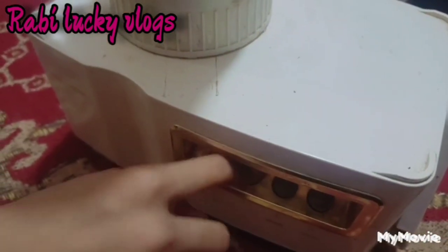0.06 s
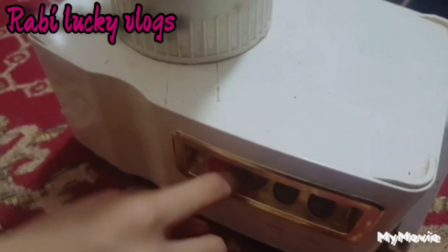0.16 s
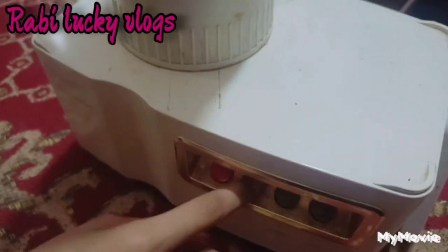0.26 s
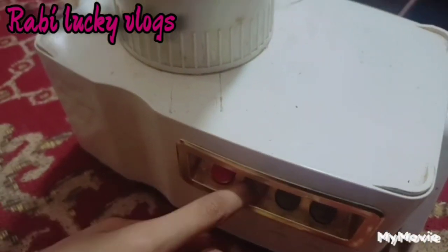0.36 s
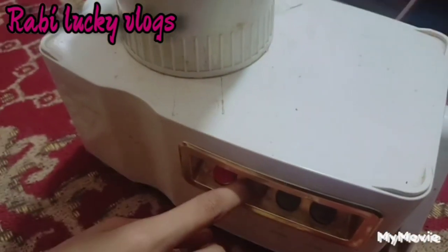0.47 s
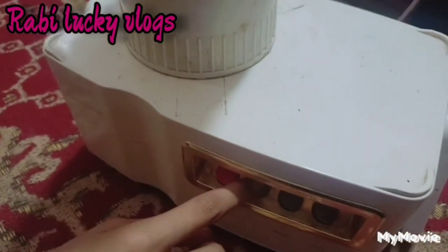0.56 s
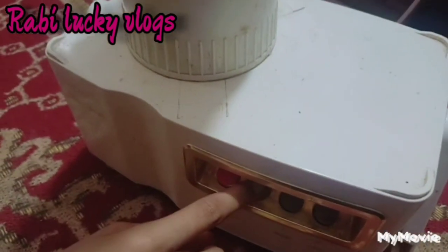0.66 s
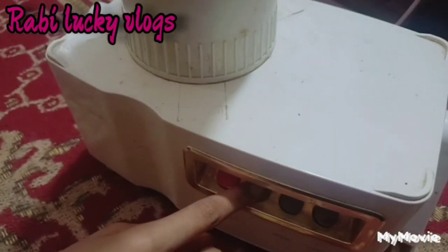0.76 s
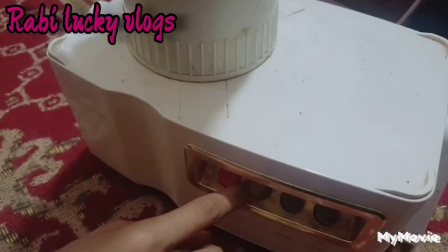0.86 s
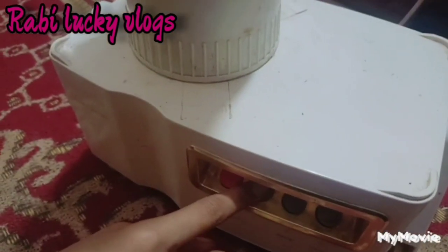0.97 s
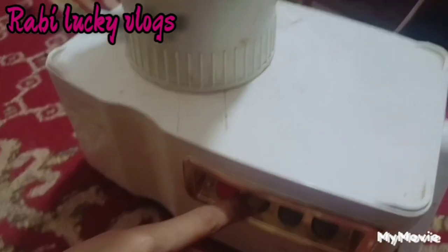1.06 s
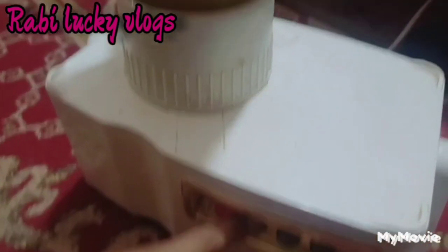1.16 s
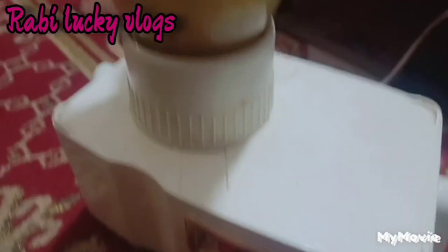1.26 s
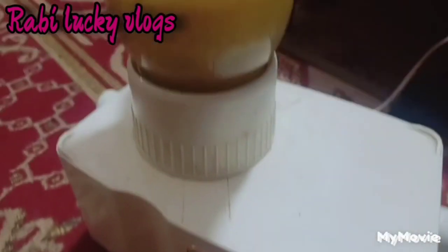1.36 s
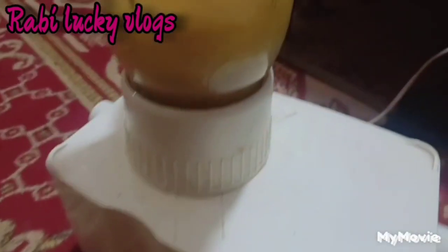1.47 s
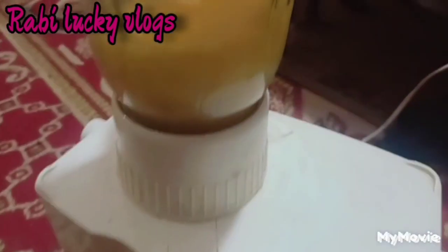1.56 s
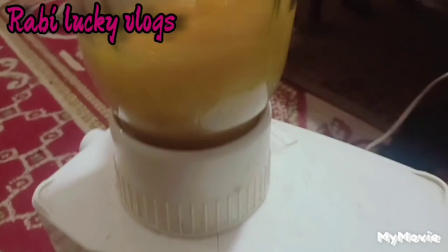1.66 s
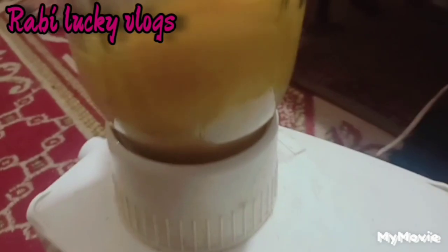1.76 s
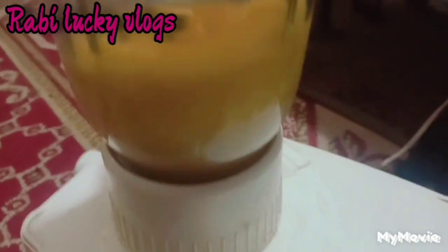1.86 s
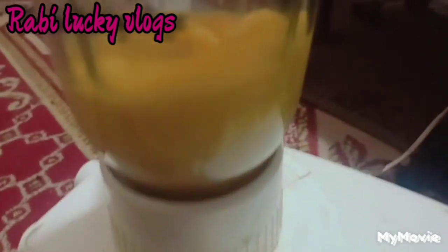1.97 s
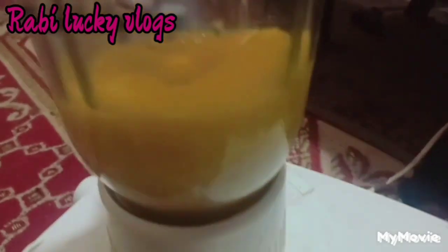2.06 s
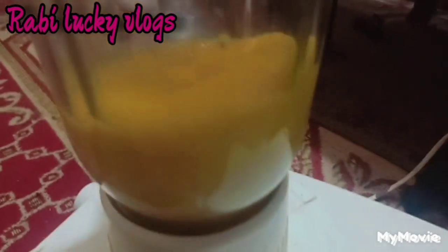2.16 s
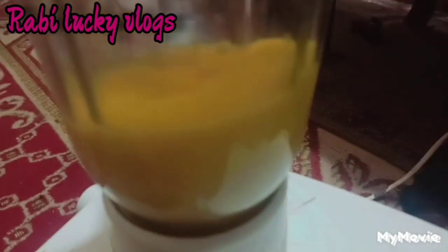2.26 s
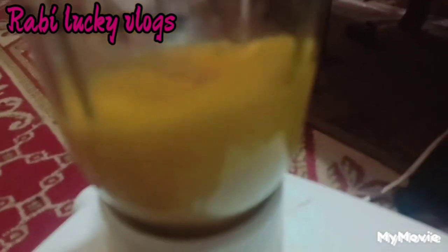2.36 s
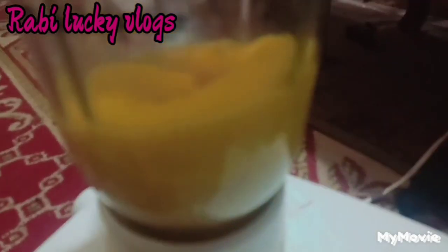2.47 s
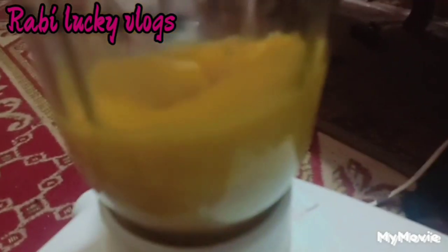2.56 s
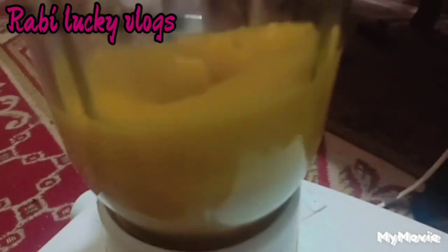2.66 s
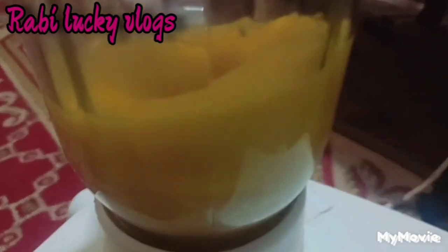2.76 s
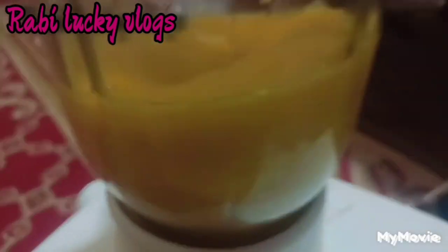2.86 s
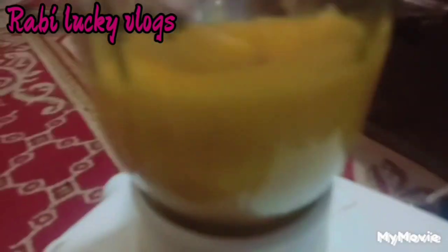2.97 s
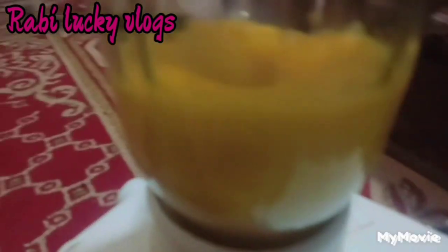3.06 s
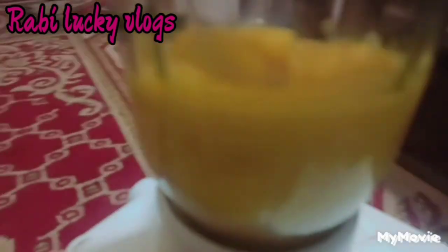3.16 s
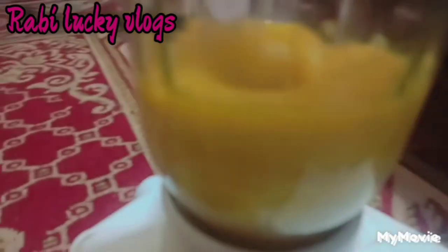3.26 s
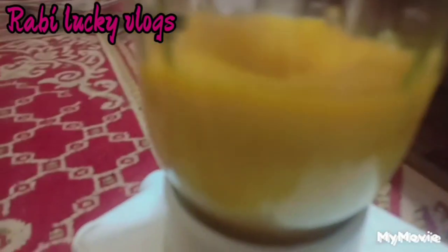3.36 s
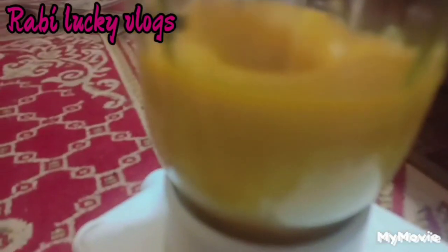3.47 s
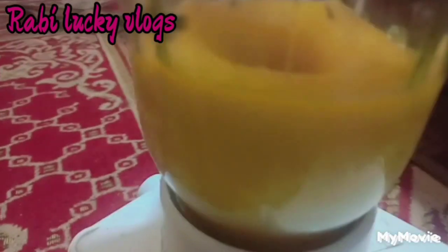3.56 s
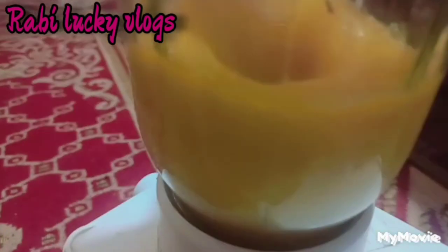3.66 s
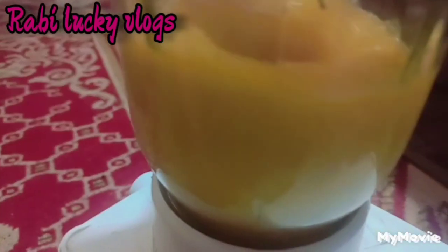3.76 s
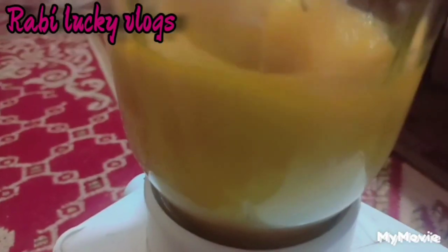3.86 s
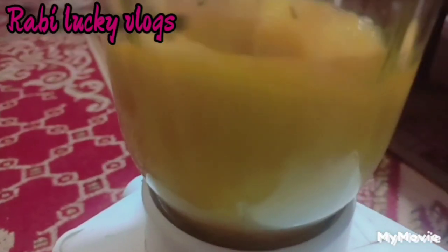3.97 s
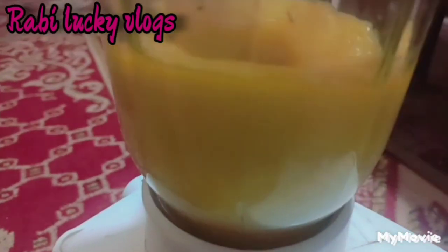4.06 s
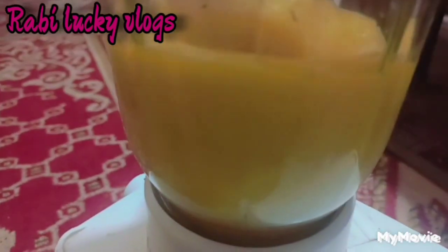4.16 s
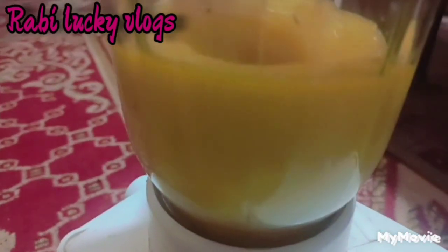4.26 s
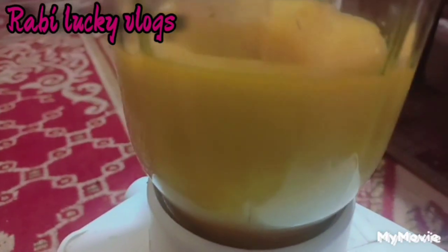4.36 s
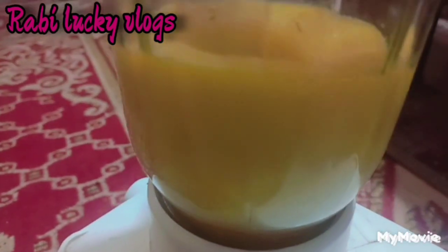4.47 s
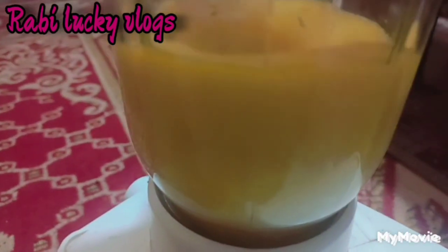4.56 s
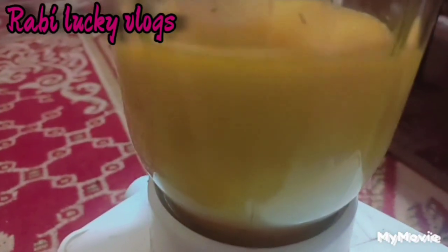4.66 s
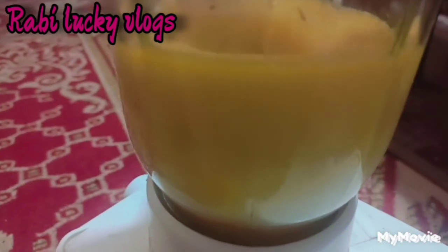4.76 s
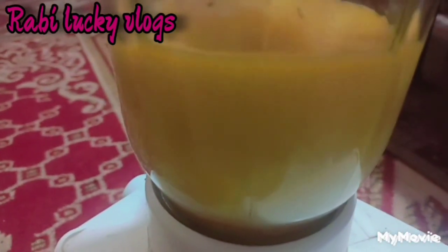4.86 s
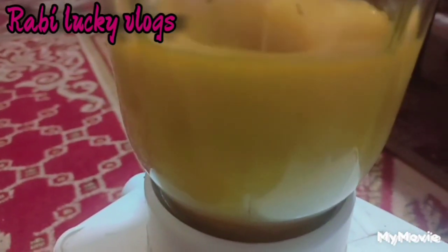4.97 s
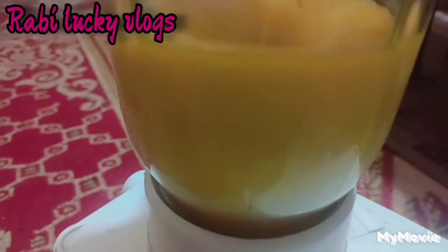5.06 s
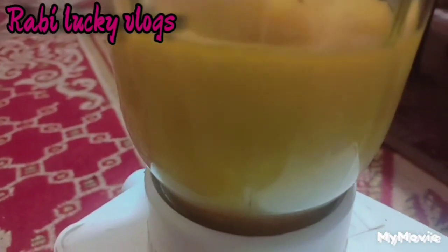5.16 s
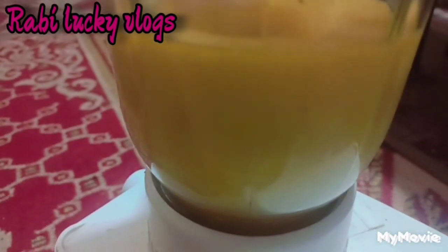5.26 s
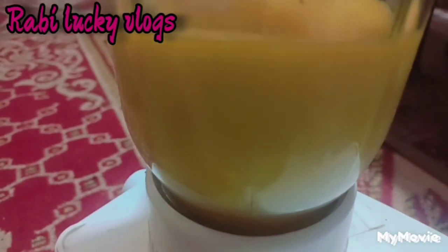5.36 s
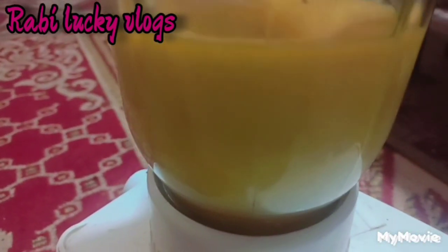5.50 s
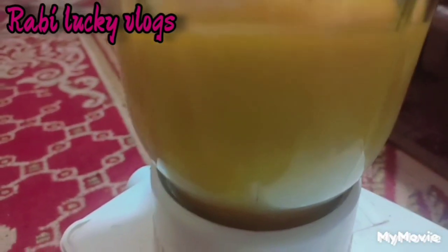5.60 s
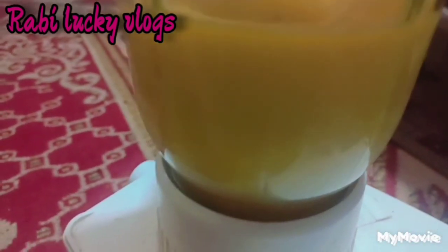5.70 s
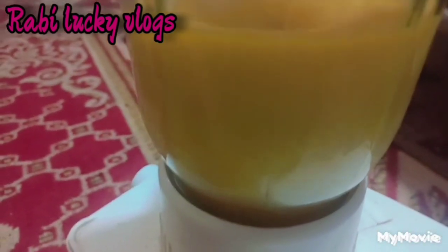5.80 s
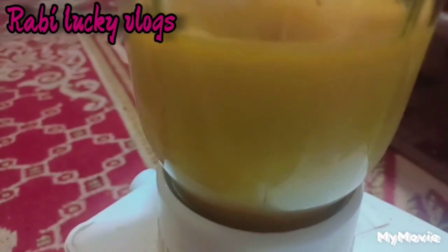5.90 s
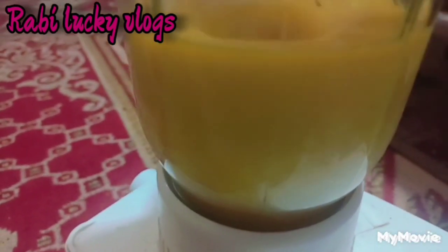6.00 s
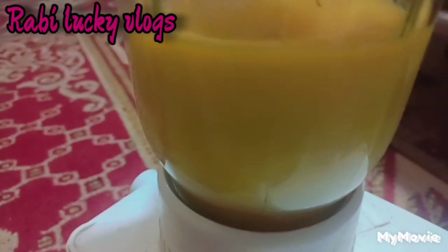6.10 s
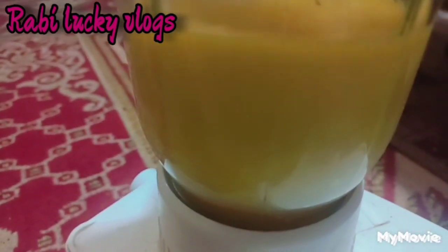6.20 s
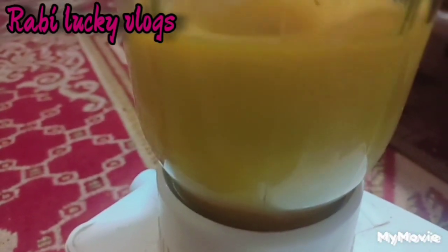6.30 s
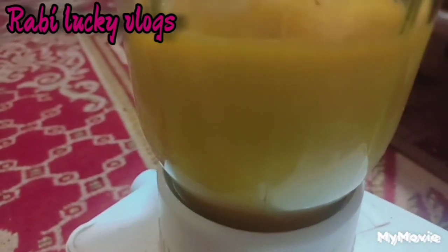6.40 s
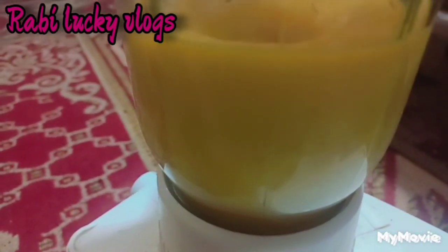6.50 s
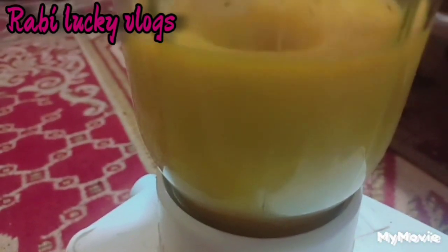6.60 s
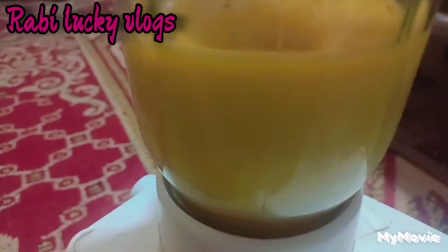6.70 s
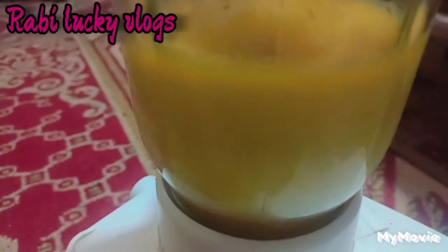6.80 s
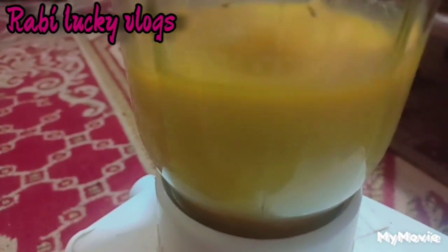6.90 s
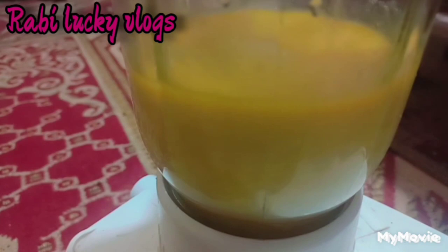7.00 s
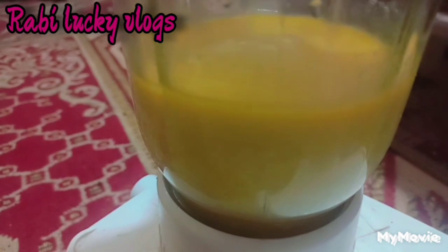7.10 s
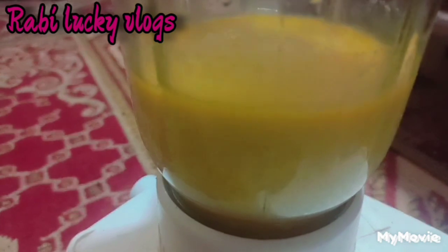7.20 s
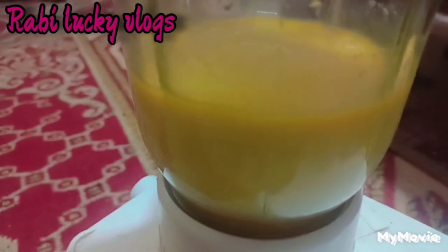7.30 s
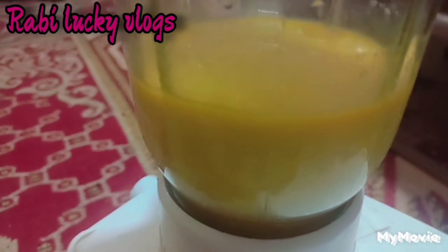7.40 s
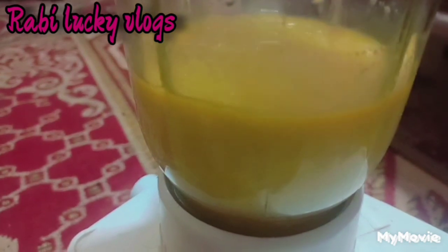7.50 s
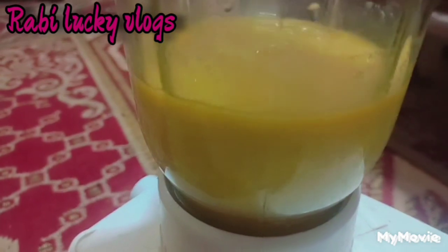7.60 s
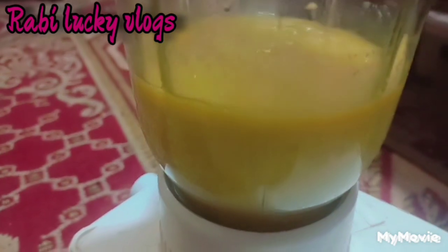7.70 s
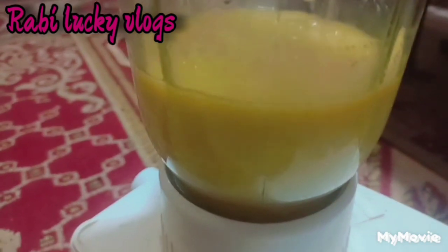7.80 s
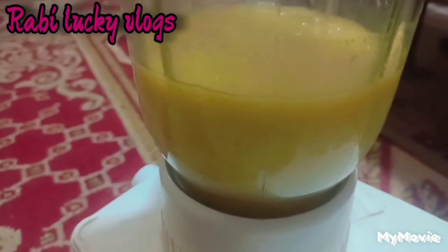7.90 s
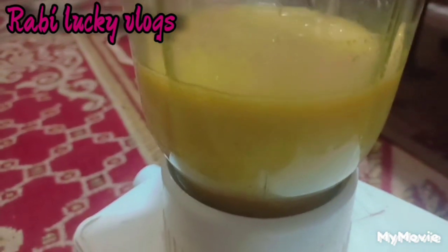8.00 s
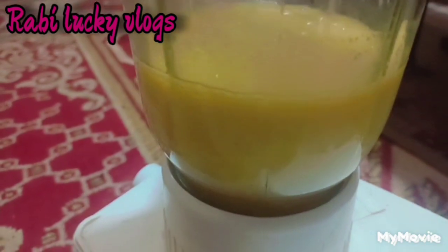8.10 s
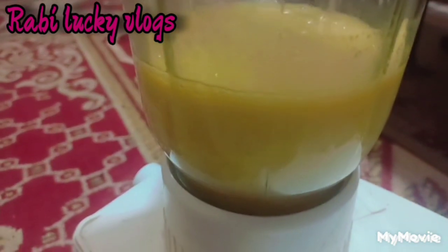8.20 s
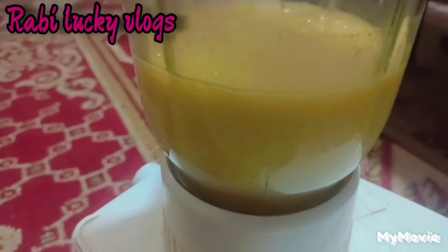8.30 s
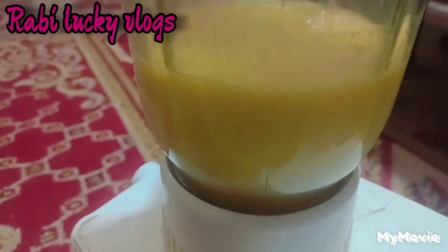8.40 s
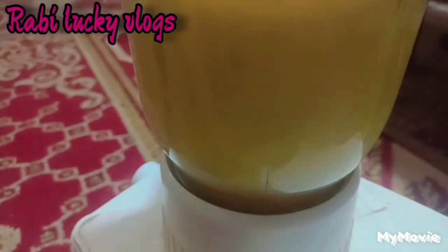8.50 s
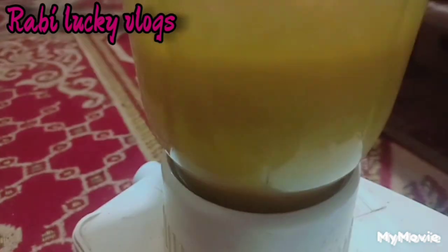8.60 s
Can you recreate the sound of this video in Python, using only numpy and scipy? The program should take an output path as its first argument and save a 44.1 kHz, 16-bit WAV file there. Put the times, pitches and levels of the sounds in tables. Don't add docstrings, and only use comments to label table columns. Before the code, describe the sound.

Close, gritty blender motor whirring through thick liquid, abruptly switched off into room hush with faint glassy ticks, then suddenly restarting at the end.

```python
import sys
import numpy as np
from scipy import signal
from scipy.io import wavfile
from scipy.ndimage import uniform_filter1d, minimum_filter1d

SR = 44100
rng = np.random.default_rng(int(sys.argv[2]) if len(sys.argv) > 2 else 0)


def put_to_file(sound):
    columns = np.atleast_2d(sound).T
    safe = np.clip(columns, -1, 1)
    whole_steps = np.round(safe * 32767)
    wavfile.write(sys.argv[1], SR, whole_steps.astype(np.int16))


def decibels_to_gain(level_db):
    exponent = np.asarray(level_db, float) / 20
    return 10 ** exponent


N = 381465

# [time_s, place (0 by the casing, 1 by the collar, 2 by the jar)]
PLACE = [(0, 0.033), (.55, 0.069), (.68, 0.68), (1.2, 0.72), (1.4, 0.9), (2.0, 1.27), (2.7, 1.1),
         (3.1, 1.56), (4.2, 1.73), (4.6, 1.76), (5.8, 1.7), (6.9, 1.66), (8.38, 0.86), (8.65, 1.7)]
COAST_S = 0.15


def blender():
    # [time_s, peak_db]
    hard_knocks = [(0.0024, -2), (0.0224, -5), (0.0393, -9), (0.0677, 10), (0.1078, -11), (0.1299, 1),
                   (0.2823, -7), (1.4272, -9), (2.3222, -2), (2.386, 1), (6.6777, -5), (6.717, -3),
                   (6.7896, 8), (8.3886, -2), (8.4022, 0), (8.4267, -8), (8.4673, 0), (8.5293, -6),
                   (8.573, -6)]
    groan_db, groan_s, coast_groan_db = 7.5, 0.26, -4
    snap_times_s, snap_db, snap_s = [6.792, 8.405], 12.5, 0.0044
    coast_dull_db = -2.5
    since, coast, (_, take_up_s, _, treble_short_db, _) = state()
    t = np.arange(N) / SR
    drive = chatter() * effort() + decibels_to_gain(-4) * burst(hard_knocks, ms=2.0)

    place = np.clip(along(PLACE), 0, 2)
    heard = 0
    for k in range(3):
        share = np.clip(1 - abs(place - k), 0, 1)
        heard = heard + share * signal.oaconvolve(drive, colour(k))[:N]

    drone, rest = split(heard, 700)
    body, treble = split(rest, 3700)
    drone_db = -0.7 + groan_db * np.exp(-(since / groan_s) ** 4)
    drone_db = drone_db + coast_groan_db * coast.clip(0, COAST_S) / COAST_S
    bright_db = -1.24 + coast_dull_db * np.clip(coast / 0.01, 0, 1)
    bright_db = bright_db + treble_short_db * np.exp(-since / take_up_s)
    bright_db = bright_db + sum(snap_db * np.exp(-((t - s) / snap_s) ** 2) for s in snap_times_s)
    return drone * decibels_to_gain(drone_db) + body + treble * decibels_to_gain(bright_db)


def chatter():
    blows_per_s, spread_db, scrape_ms = 2500, 0.5, 1.9
    clump_db, hiss = 0.9, 0.9
    chips_per_s, chips_db = 14, 13
    grit_per_s, grit_db = 110, 5
    own_db, drift_db = 1.5, 0.38
    rate, depth = speed()
    turns = np.cumsum(rate * (1 + 0.056 * wander(17.0))) / SR
    beat = (1 + depth * np.cos(2 * np.pi * turns)) * decibels_to_gain(clump_db * wander(39))
    size = decibels_to_gain(spread_db * np.minimum(rng.exponential(1, N), 3))
    size = size * (rng.random(N) < blows_per_s / SR)
    scrape = signal.lfilter([1], [1, -np.exp(-1000 / SR / scrape_ms)], size)
    scrape = evened(scrape * rng.standard_normal(N))
    blows = evened(beat * scrape + hiss * rng.standard_normal(N))

    grit = signal.lfilter([1], [1, -.985], rng.random(N) < grit_per_s / SR) * rng.standard_normal(N)
    grit = split(grit, 3560)[1]
    chips = signal.lfilter([1], [1, -.96], rng.random(N) < chips_per_s / SR) * rng.standard_normal(N)
    mix = blows + decibels_to_gain(chips_db) * chips + decibels_to_gain(grit_db) * grit

    z = signal.stft(mix, nperseg=256, noverlap=128)[2]
    bins, frames = z.shape
    own = own_db * patches(frames, bins, 3, 3)
    drift = drift_db * patches(frames, bins, 150, 2)
    return evened(signal.istft(z * decibels_to_gain(own + drift), nperseg=256, noverlap=128)[1][:N])


def speed():
    spin_from, spin_to, spin_up_s, spin_down_s = 42, 66, 0.8, 0.25
    beat_running, beat_starting, beat_s = 0.17, 0.8, 0.085
    since, coast, _ = state()
    rate = spin_to + (spin_from - spin_to) * np.exp(-since / spin_up_s)
    rate = rate * np.exp(-coast / spin_down_s)
    depth = beat_running + beat_starting * np.exp(-np.arange(N) / SR / beat_s)
    return rate, np.clip(depth, 0, 1)


def effort():
    # [time_s, chatter_db]
    bite = [(0, -11), (.25, -11), (.8, -13.5), (1.17, -9), (1.35, -11), (1.6, -13), (1.9, -11), (2.5, -12),
            (3.15, -11), (3.5, -11), (4.2, -10.5), (4.6, -12.5), (5.1, -10.5), (5.65, -10.5), (5.8, -11.5),
            (6.78, -11), (8.4, -11.5), (8.65, -10.5)]
    # [time_s, depth_db, recovery_s]
    air_gulps = [(.008, -5, 0.011), (.046, -3, 0.017), (1.2, -5.5, 0.083), (1.47, -3, 0.039),
                 (1.98, -3, 0.061), (2.35, -4.5, 0.022), (2.4, -3, 0.046), (3.2, -4, 0.092),
                 (4.27, -3, 0.073), (4.72, -2.5, 0.03), (4.92, -2.5, 0.081), (5.15, -3.5, 0.061),
                 (6.27, -2, 0.02), (6.33, -1.5, 0.21), (6.655, -4, 0.031), (6.7, -0.5, 0.027),
                 (6.77, -6, .03), (8.406, -3, .015)]
    # [after_cut_s, step_db]
    coast_steps = [
        (0.0, -5.5),
        (0.078, -6),
        (0.127, -5),
    ]
    gulp_in_s, coast_db_per_s = 0.0057, -25
    since, coast, (_, take_up_s, chatter_short_db, _, _) = state()
    t = np.arange(N) / SR
    level_db = along(bite) + chatter_short_db * np.exp(-since / take_up_s) + coast_db_per_s * coast
    for s, db, back_s in air_gulps:
        recovery = np.exp(-np.maximum(t - s - gulp_in_s, 0) / back_s)
        level_db = level_db + db * np.clip((t - s) / gulp_in_s, 0, 1) * recovery
    for s, db in coast_steps:
        level_db = level_db + db * np.clip((coast - s) / 0.004, 0, 1)
    return decibels_to_gain(level_db) * (coast < COAST_S)


def state():
    # [start_s, take_up_s, chatter_short_db, treble_short_db, inrush_hum_db]
    starts = [
        (0.0, 0.12, -3, -13.5, 9),
        (8.386, 0.017, -6, -12, 5),
    ]
    off_s = 6.795
    t, rows = np.arange(N) / SR, np.array(starts)
    index = np.searchsorted(rows[:, 0], t, "right") - 1
    last = rows[np.clip(index, 0, None)].T
    coast = np.maximum(t - off_s, 0) * (t < rows[-1, 0])
    return np.maximum(t - last[0], 0), coast, last


def colour(place):
    # [pitch_hz, casing_db, collar_db, jar_db]
    broad = [(40, -37, -39, -49), (63.5, -31, -26, -44), (104, -35, -47, -34), (211, -15, -18.5, -27.5),
             (604, -18, -22, -21), (1025, -15, -25.5, -17.5), (2270, -6.5, -12, -12.5),
             (3304, 4.5, -3.5, -4.5), (4220, -2.5, -11.5, -2.5), (7020, -19, -20, -24.5),
             (9280, -14.5, -32, -31.5), (10050, -24.5, -38, -36.5), (12000, -33, -33, -42),
             (15500, -43, -33.5, -43)]
    # [pitch_hz, width_hz, casing_db, collar_db, jar_db]
    body_rings = [(154, 8.1, 1, -19.5, -14), (218, 19, -2, -15, 17), (232.7, 30, 3, 8.5, -23),
                  (371, 148, 7.5, 7.5, 10.5), (458.4, 57, -5, -16, -15), (614, 88, 11.5, 1.5, -4),
                  (827, 177, 8.5, 16.5, 10), (1285, 80, -0.5, 5.5, 0.5), (1461, 124, 1, 8, 7),
                  (1744, 94, -4, -6.5, -8.5), (1877, 150, 9.5, 10, 9.5), (2658, 200, 2.5, 1.5, 8),
                  (2890, 108, 7.5, 4, 9.5), (3210, 280, 5.5, 0, -1),
                  (3508, 234, -2, 7.5, 3.5), (3800, 180, -4, 3.5, 3.5), (4404, 290, 1, -1.5, -20),
                 (4796, 130, -7, -17.5, 0), (5097, 420, -2.5, -13, -10), (5970, 450, 2, 5.5, 1),
                 (6470, 430, 4.5, -5, -9.5), (7190, 1630, 13, 3, 12.5), (7890, 920, 3.5, 1.5, -6.5),
                 (9020, 330, 8.5, 0, 8.5), (11000, 700, 4, -2, 1.5), (12200, 494, 1, -1, -1),
                 (13300, 800, -2, -5, 6), (14600, 600, 12, -12, 0)]
    hz = np.fft.rfftfreq(8192, 1 / SR)
    rows = np.array(broad)
    db = np.interp(np.log(hz + 1), np.log(rows[:, 0]), rows[:, 1 + place])
    for ring in body_rings:
        db = db + ring[2 + place] / (1 + (2 * (hz - ring[0]) / ring[1]) ** 2)
    return causal(db)


def windings():
    # [pitch_hz, level_db, change_away_from_casing_db]
    harmonics = [(100, -70, 0), (149.8, -49, 2), (200.8, -42, -5.5), (251, -55, 3), (303, -45, -1.5),
                 (352, -56, -6)]
    near_db, far_db, edge_place, inrush_s = 2.5, -2, 0.72, 0.086
    since, coast, (_, _, _, _, inrush_db) = state()
    t = np.arange(N) / SR
    away = np.clip((along(PLACE) - edge_place) / 0.08 + .5, 0, 1)
    lines = 0
    for hz, db, change_db in harmonics:
        strength = decibels_to_gain(db + 1.0 + change_db * away + 2.1 * wander(6.7))
        lines = lines + strength * np.sin(2 * np.pi * (hz * t + rng.random()))
    level_db = near_db + (far_db - near_db) * away + inrush_db * np.exp(-since / inrush_s)
    powered = uniform_filter1d(1. * (coast == 0), size=400)
    return lines * decibels_to_gain(level_db) * powered


def ticks():
    # [time_s, peak_db, treble_db]
    pause_ticks = [(6.9744, -25, -10), (7.01, -6, -25), (7.0443, -18, -17), (7.1856, -32, -18),
                   (7.249, -12.5, -26), (7.3654, -21.5, -17), (7.7199, -31, -20), (7.974, -15.5, -25),
                   (8.1375, -16.5, -17), (8.281, -17.5, -13.5)]
    # [time_s, peak_db, t60_s]
    clinks = [
        (7.2524, -26, 0.032),
        (7.9857, -37, 0.15),
        (8.142, -21.5, 0.04),
        (8.286, -30, 0.19),
    ]
    glass_hz = 7350
    rows, t = np.array(pause_ticks), np.arange(N) / SR
    jar = colour(2)
    body = signal.oaconvolve(burst(rows[:, :2], ms=4.4), jar)[:N]
    body = split(body, 3280)[0]
    body = split(body, 1730)[1]
    edge_events = np.c_[rows[:, 0], rows[:, 1] + rows[:, 2]]
    edge = signal.oaconvolve(burst(edge_events, ms=11.0), jar)[:N]
    edge = split(edge, 6500)[1]
    edge = split(edge, 12500)[0]
    dying = 0
    for s, db, t60 in clinks:
        dying = dying + decibels_to_gain(db - 3.0 - 60 * abs(t - s) / np.clip(t60, .03, .2)) * (t > s)
    glass = dying * np.sin(2 * np.pi * glass_hz * t)
    return room(decibels_to_gain(2.0) * body + decibels_to_gain(19.0) * edge + glass)


def rustle():
    start_s, level_db, band_hz = 7.91, -49.5, (4600, 9600)
    t = np.arange(N) / SR
    band = signal.butter(4, band_hz, "band", fs=SR, output="sos")
    cloth = evened(signal.sosfilt(band, rng.standard_normal(N)))
    cloth = cloth + decibels_to_gain(-17) * rng.standard_normal(N)
    return cloth * decibels_to_gain(level_db + 3.1 * wander(18)) * np.clip((t - start_s) / 0.066, 0, 1)


def hush():
    # [pitch_hz, level_db_per_hz]
    air_colour = [(38, -35), (62, -9.5), (190, 3), (400, -12), (530, -5.5), (880, -7.5), (1950, -16.5),
                  (2900, -12), (4000, -11), (4500, -26.5), (7300, -22), (9500, -27.5), (10300, -40),
                  (13000, -49), (15500, -45)]
    # [pitch_hz, width_hz, level_db]
    air_rings = [(185, 49, -3.5), (322, 160, -1.5), (530, 29, 6), (579, 40, 6.5), (766, 80, -4.5),
                 (870, 42, 5.5), (2580, 80, 4.5), (2920, 110, 7), (3330, 101, 2), (3980, 150, 4),
                 (6900, 280, 4), (7900, 300, 6)]
    # [time_s, level_db]
    air_level = [(6.95, -30.5), (7.132, -32), (8.06, -31), (8.35, -31)]
    # [time_s, pitch_hz, length_s, level_db]
    far_bumps = [
        (7.40, 870, .05, -41),
        (7.40, 570, .05, -41),
        (7.67, 600, .04, -39),
        (7.78, 885, .06, -36),
        (8.21, 850, .12, -40),
    ]
    duck_db = -8.5
    frames, hz = N // 256 + 5, np.fft.rfftfreq(1024, 1 / SR)
    a, b = rng.standard_normal((frames, 513, 2)).T
    rows = np.array(air_colour)
    shape_db = np.interp(np.log(hz + 1), np.log(rows[:, 0]), rows[:, 1])
    for f, wide, db in air_rings:
        shape_db = shape_db + db / (1 + (2 * (hz - f) / wide) ** 2)
    patchy_db = np.interp(hz, [1000, 4000, 5000], [2.4, 1.8, 1])[:, None] * patches(frames, 513, 10, 2)
    spectrum = (a + 1j * b) * decibels_to_gain(shape_db[:, None] + patchy_db)
    air = evened(signal.istft(spectrum, nperseg=1024, noverlap=768)[1][:N])

    t = np.arange(N) / SR
    bumps = 0
    for s, f, length_s, db in far_bumps:
        swell = np.exp(-(2 * (t - s) / length_s) ** 2)
        bumps = bumps + decibels_to_gain(db) * swell * np.sin(2 * np.pi * f * t)
    ducked_db = np.interp(t, [6.8, 6.9, 8.39, 8.45], [duck_db, 0, 0, duck_db])
    return air * decibels_to_gain(along(air_level) + ducked_db) + bumps


def room(x, t60=0.16, wet_db=-7):
    taps = np.zeros(SR // 2)
    at = np.arange(120, len(taps) - 20, 20)
    fade = decibels_to_gain(-60 * at / SR / t60)
    taps[at + rng.integers(0, 20, len(at))] = rng.choice([-1., 1.], len(at)) * fade
    return x + decibels_to_gain(wet_db) * signal.oaconvolve(x, taps / np.linalg.norm(taps))[:N]


def burst(events, ms):
    out, u_ms = np.zeros(N + 1000), np.arange(1000) / SR * 1000
    envelope = np.exp(-u_ms / ms) * np.minimum(u_ms / 0.38, 1)
    for (s, db), puff in zip(events, rng.standard_normal((len(events), 1000))):
        out[round(s * SR):][:1000] += decibels_to_gain(db) * puff * envelope
    return out[:N]


def patches(frames, bins, long, wide):
    field = rng.standard_normal((frames, bins)).T
    for _ in range(2):
        field = uniform_filter1d(uniform_filter1d(field, wide, 0), long, 1)
    return evened(field)


def wander(hz):
    pole = np.exp(-2 * np.pi * hz * 32 / SR)
    steps = signal.lfilter([1], [1, -pole], rng.standard_normal(N // 32 + 2))
    steps = evened(steps - uniform_filter1d(steps, size=110))
    return np.interp(np.arange(N) / 32, np.arange(len(steps)), steps)


def causal(db):
    log_gain = np.log(decibels_to_gain(np.r_[db, db[-2:0:-1]]))
    ring = np.fft.ifft(np.exp(np.conj(signal.hilbert(log_gain)))).real[:4096]
    return ring / np.linalg.norm(ring)


def split(x, hz):
    low = signal.sosfiltfilt(signal.butter(2, hz, fs=SR, output="sos"), x)
    return low, x - low


def along(rows, column=1):
    rows = np.asarray(rows)
    return np.interp(np.arange(N) / SR, rows[:, 0], rows[:, column])


def evened(x):
    return x / np.sqrt(np.mean(x ** 2) + 1e-20)


def scene():
    return (blender() + windings() + ticks() + rustle() + hush())[None]


def band_limit(x):
    return signal.sosfilt(signal.butter(12, 15670, fs=SR, output="sos"), x)


def record(dry):
    dry = signal.sosfilt(signal.butter(2, 40, "high", fs=SR, output="sos"), dry)
    ceiling, span = .93, 88
    room_left = np.minimum(1, ceiling / (abs(dry) + 1e-9))
    held = dry * uniform_filter1d(minimum_filter1d(room_left, span), span)
    held = signal.oaconvolve(held, signal.firwin(511, 15600, fs=SR)[None], "same")
    return band_limit(held)


dry = scene()
out = record(dry)
put_to_file(out)
```